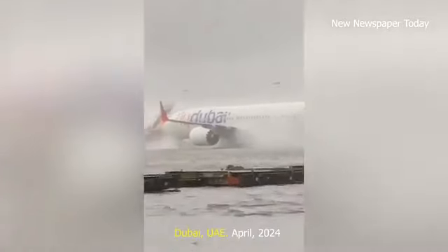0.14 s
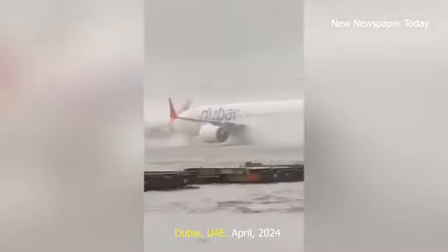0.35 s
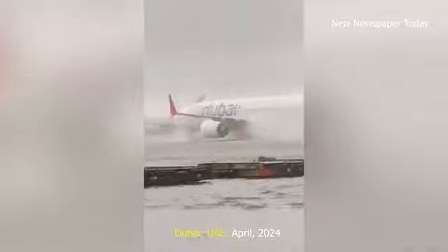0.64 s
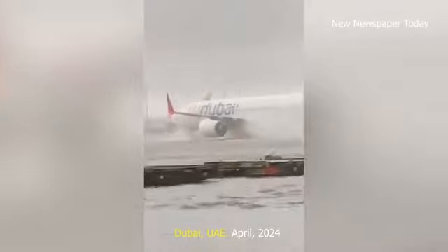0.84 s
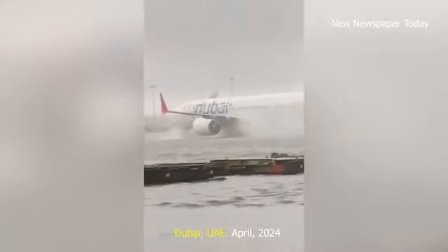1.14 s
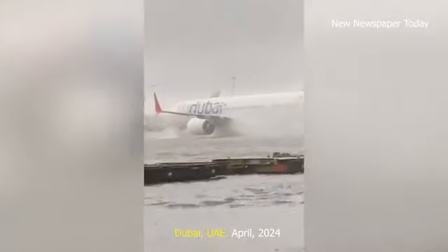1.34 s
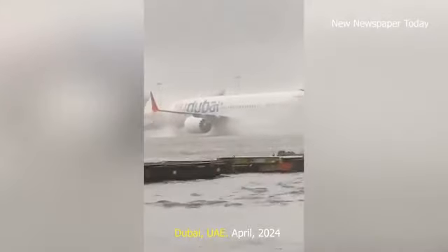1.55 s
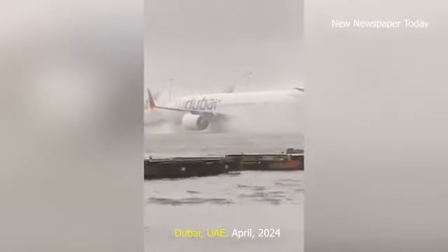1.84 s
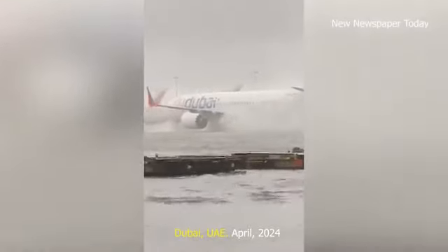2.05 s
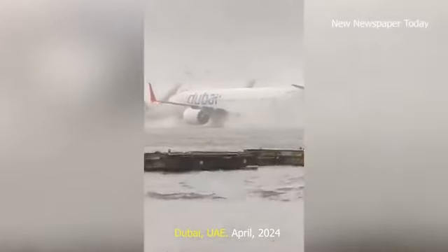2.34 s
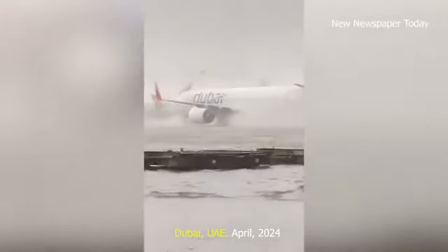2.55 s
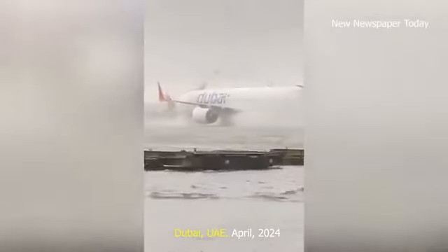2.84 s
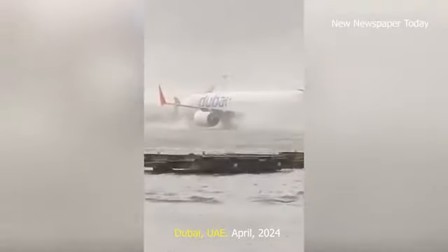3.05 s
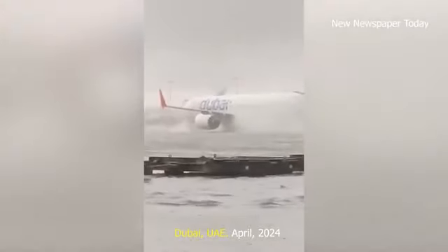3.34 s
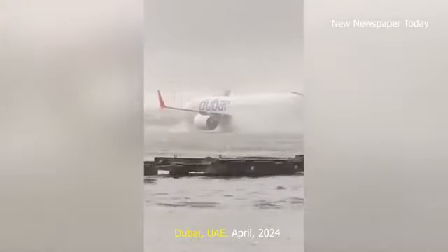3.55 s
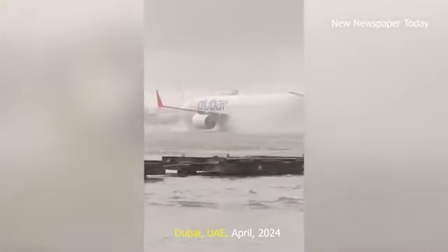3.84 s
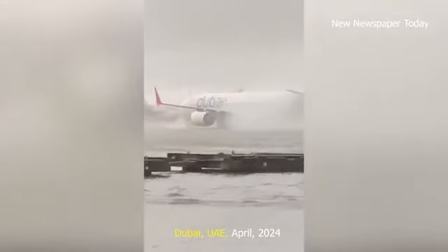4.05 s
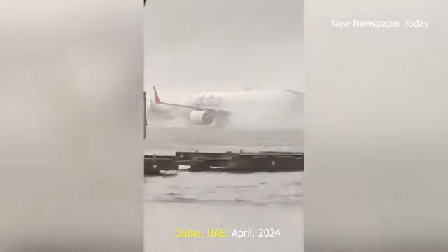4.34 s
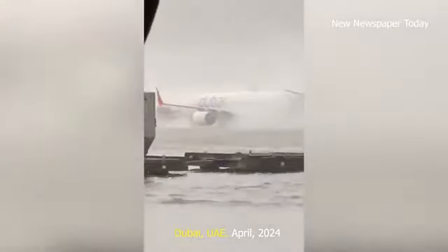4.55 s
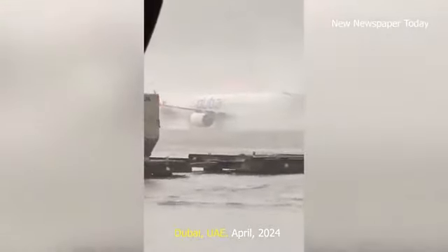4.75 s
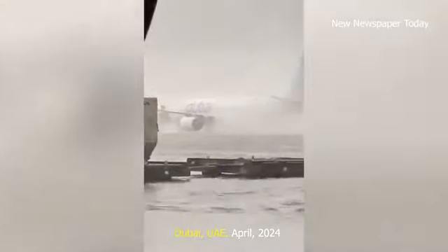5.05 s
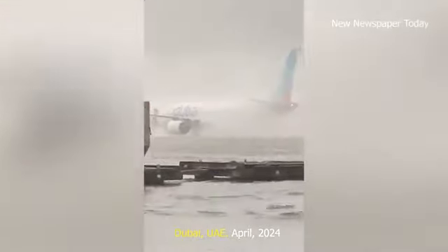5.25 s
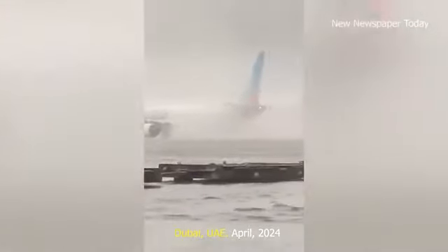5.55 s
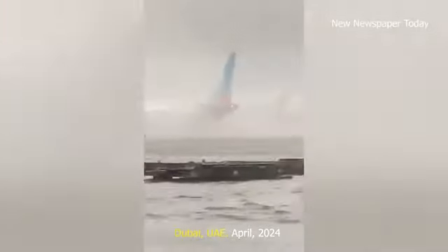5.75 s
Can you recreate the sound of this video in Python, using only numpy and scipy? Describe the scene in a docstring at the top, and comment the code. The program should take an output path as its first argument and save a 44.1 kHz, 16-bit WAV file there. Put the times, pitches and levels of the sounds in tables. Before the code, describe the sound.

Outdoor phone capture in stereo: continuous spattery water hiss and jet engine noise at a distance, with two slightly different whining tones fading in and out over a surging low roar. Close wind noise pops and rumbles on the microphone early, gets violent, drops away mid-way leaving engines and water clearer, then returns as heavy dull thuds, strongest shortly before the end.

```python
"""An airliner taxis through deep floodwater, heard across an apron in a storm.
From the start its fans whine in fading tones, its exhaust roars as coloured noise, and spray and rain hiss.
Wind on a phone's two ports slaps and thumps at once, worst from about 1.4 to 1.8 s, then eases.
A short knock near 2.7 s leads to a calmer stretch; gusts return after 4.5 s and peak near 5.4 s.
Buffets, flutter and thumps are shaped noise, eddies opposed noise, slaps single pressure pulses."""
import sys
import numpy as np
from scipy import signal
from scipy.fft import rfft, irfft, next_fast_len
from scipy.io import wavfile
from scipy.ndimage import uniform_filter1d, minimum_filter1d, map_coordinates

SR = 44100
rng = np.random.default_rng(int(sys.argv[2]) if len(sys.argv) > 2 else 0)


def wrap_up_sound(samples):
    """Save the sound to the file named by the first command line argument, as 16-bit audio."""
    columns = np.atleast_2d(samples).T
    # keep every value between -1 and 1, then stretch to whole-number steps
    tamed = np.clip(columns, -1, 1)
    steps = np.round(tamed * 32767).astype(np.int16)
    wavfile.write(sys.argv[1], SR, steps)


N = 260190

# Spray and rain colour. Each row: frequency in Hz, density in dB per Hz (relative).
SPRAY_SPECTRUM = [(400, -25), (1200, .3), (1800, .7), (2100, 2.5), (2700, 1.7), (3500, .3), (4300, .3),
                  (4650, 1.2), (4900, 2), (5300, .8), (5900, -1), (6700, .8), (7900, -5), (8800, -2.5),
                  (9200, -8), (9600, -8), (10000, -13), (10900, -16), (11400, -28)]
# Left-right likeness of the spray. Each row: frequency in Hz, correlation from -1 to 1.
SPRAY_ALIKE = [(1200, .1), (1800, .97), (2100, .85), (2500, .4), (3300, .98), (4000, .97), (4600, .3),
               (4790, -.88), (4970, -.9), (5130, .4), (5300, .97), (6200, .97), (6600, .65), (7200, .55),
               (8500, .1), (9800, -.94), (11000, -.98)]

# Low wind buffeting. Each row: time in seconds, level in dB before BUFFET_TRIM_DB.
BUFFET_LEVEL = [(0.0, -36), (0.75, -29), (1.13, -35.5), (1.22, -22), (1.28, -26.5), (1.40, -12),
                (1.47, -23.5), (1.68, -20.5), (1.79, -16), (1.9, -29), (2.05, -31.5), (2.56, -41),
                (2.66, -28), (2.8, -24.5), (2.93, -34.5), (3.45, -37), (3.54, -28), (3.95, -31),
                (4.03, -20), (4.28, -30), (4.42, -22.5), (4.65, -19.5), (4.8, -31), (4.98, -22.5),
                (5.3, -20.5), (5.5, -14.5), (5.56, -19), (5.9, -25)]
# Brighter wind flutter. Each row: time in seconds, level in dB before the trim and the tearing threshold.
FLUTTER_LEVEL = [(0.0, -24.5), (0.56, -27.5), (0.67, -22), (0.77, -29.5), (1.08, -27.5), (1.74, -27),
                 (1.94, -29.5), (2.25, -29), (2.5, -28.5), (4.08, -30), (4.55, -27), (4.76, -33.5),
                 (5.41, -25.5), (5.52, -29.5), (5.9, -26)]
# Colours of buffeting and flutter. Each row: frequency in Hz, density in dB per Hz (relative).
BUFFET_SPECTRUM = [(15, -24), (35, -6), (60, 9), (90, 6.5), (130, 1.5), (220, -10.5), (500, -11),
                   (1200, -92)]
FLUTTER_SPECTRUM = [(60, -39), (140, -15), (200, 6.5), (300, 2.5), (450, -5.5), (700, -13.5), (1100, -28.5),
                    (2500, -16.5), (6000, -100)]
BUFFET_TRIM_DB, FLUTTER_TRIM_DB = -.5, .5
TEAR_DB = -30.5  # flutter dies away below this level

# Puffs that strike the ports differently. Each row: time in seconds, level in dB, half-length in seconds.
EDDIES = [(0.2, -33, .15), (0.51, -29.5, .025), (0.774, -29, .035), (1.08, -29, .09), (1.49, -21, 0.07),
          (1.605, -27, .04), (1.888, -21.5, 0.035), (2.52, -27, .05), (3.248, -35.5, .03),
          (3.748, -29, .035), (4.612, -27, 0.17), (4.882, -31.5, 0.027), (5.328, -31.5, .06),
          (5.57, -26.5, 0.049), (5.78, -33.5, .08)]
# Eddy colour. Each row: frequency in Hz, density in dB per Hz (relative).
EDDY_SPECTRUM = [(20, -4), (60, 2), (120, 7), (280, 12.5), (500, 7), (900, 0), (2000, -38)]

# Gusts that hit the ports head-on. Each row: time in seconds, level in dB, half-length in seconds,
# brightness in dB per octave about THUMP_PIVOT_HZ.
THUMPS = [(0.303, -15.5, 0.022, -1), (0.694, -22.5, .03, 1.5), (1.026, -21.5, 0.018, 2.5),
          (1.392, -11.5, 0.02, -3), (1.649, -9.5, 0.015, 0.5), (1.77, -13.5, 0.024, -0.5),
          (2.706, -20, 0.024, 4.5), (2.763, -23.5, .04, 5), (4.54, -12, 0.013, -5),
          (4.975, -14.5, 0.018, -7), (5.361, -13.5, 0.019, -8), (5.433, -11, 0.019, 0.5),
          (5.494, -12.5, 0.03, -9)]
# Thump colour before brightness. Each row: frequency in Hz, density in dB per Hz (relative).
THUMP_SPECTRUM = [(30, -9), (70, 4.5), (160, 4), (310, 0.5), (560, -4.5), (850, -16.5), (1200, -25),
                  (2500, -43), (6000, -100)]
THUMP_PIVOT_HZ = 250

# Single vortices that slap the ports. Each row: time in seconds, level of the main push in dB, pitch in Hz.
SLAPS = [(0.077, -12, 230), (0.109, -12, 150), (0.188, -11, 220), (0.214, -6, 340), (0.308, -13, 260),
         (0.381, -13, 150), (0.646, -13, 260), (1.012, -10.5, 474), (1.063, -10, 290), (1.195, -7, 200),
         (1.217, -7.5, 140), (1.372, -8, 150), (1.394, -6.5, 190), (1.64, -7, 300), (1.658, -5, 420),
         (1.686, -5.5, 140), (1.772, -10, 280), (1.807, -11, 100), (1.915, -10, 141), (2.704, -9, 430),
         (3.255, -12, 190), (3.324, -11, 240), (3.536, -13, 170), (4.55, -9, 80), (4.885, -12.5, 138),
         (4.961, -7.5, 170), (5.216, -10, 130), (5.245, -10.5, 230), (5.392, -5, 260), (5.444, -4, 260),
         (5.472, -6, 120), (5.496, -7.5, 75), (5.594, -9.5, 110)]
SNAP_DB, SNAP_RATIO = -13.5, 2.4  # sharp core: level re main push, times narrower

# Exhaust roar. Each row: time in seconds, level in dB.
ROAR_LEVEL = [(0.0, -26.5), (0.35, -25), (0.57, -29.5), (1.02, -26), (1.47, -34), (1.7, -26), (2.15, -31.5),
              (2.6, -27.5), (3.3, -27.5), (3.8, -27.5), (4.1, -26), (4.3, -29.5), (4.85, -28.5), (5.5, -27),
              (5.9, -27.5)]
# Exhaust colour. Each row: frequency in Hz, density in dB per Hz (relative).
ROAR_SPECTRUM = [(25, -42), (60, -22), (120, -16), (220, -4.5), (350, -1.5), (480, 4), (620, -3), (800, -2),
                 (950, -10), (1300, -15), (2500, -78)]
# Left-right likeness of the exhaust. Each row: frequency in Hz, correlation from -1 to 1.
ROAR_ALIKE = [(60, 0.99), (150, 1), (300, 0.84), (500, 0.34), (750, 0), (1200, 0)]
ROAR_PATCHY_DB = 2.8
# Deep engine drone, rising and fading on a curve of its own.
# Each row: time in seconds, level in dB before a 2 dB cut.
DRONE_LEVEL = [(0.0, -24.5), (0.33, -21.5), (0.55, -27), (0.68, -25.5), (0.77, -34), (1.03, -21.5),
               (1.2, -17.5), (1.5, -23.5), (1.88, -21.5), (2.05, -38.5), (2.27, -33.5), (2.49, -20),
               (2.85, -33.5), (3.07, -33.5), (3.15, -18.5), (3.21, -25), (3.53, -18.5), (3.64, -24),
               (3.76, -19), (3.92, -23), (4.2, -20.5), (4.48, -23.5), (4.86, -20.5), (5.3, -23),
               (5.45, -16), (5.62, -25), (5.9, -17.5)]
# Deep drone colour. Each row: frequency in Hz, density in dB per Hz (relative).
DEEP_SPECTRUM = [(70, -45), (100, -7), (120, -1), (152, -5.5), (180, 2.5), (205, -8), (260, -6), (400, -89),
                 (1200, -100)]
# Droning resonances of the engines. Each row: frequency in Hz, width in Hz, mean level in dB.
DRONE_BANDS = [(179, 20, -31.5), (266, 16, -38.5), (307, 20, -32), (517, 22, -39), (585, 20, -46),
               (640, 24, -46)]

# Fan tones, each rising and fading on a curve of its own: near fan, its octave, far fan.
# Each row: time in seconds, level in dB before the trim.
NEAR_LEVEL = [(0.0, -34), (0.2, -37.5), (0.33, -35.5), (0.38, -53.5), (0.46, -41), (0.73, -53),
              (0.82, -37.5), (0.9, -39.5), (0.98, -46), (1.2, -45.5), (1.36, -47.5), (1.46, -40.5),
              (1.6, -39.5), (1.8, -57), (1.92, -38.5), (2.03, -51.5), (2.2, -38), (2.4, -41), (2.53, -33.5),
              (2.66, -36.5), (2.84, -46), (2.96, -38.5), (3.15, -33), (3.36, -43.5), (3.58, -35),
              (3.65, -54), (3.79, -40.5), (3.88, -47), (4.05, -38), (4.2, -34), (4.28, -37), (4.35, -43),
              (4.5, -37), (4.6, -43.5), (4.73, -39), (4.92, -44.5), (5.04, -36.5), (5.18, -38), (5.22, -51),
              (5.36, -48.5), (5.8, -39), (5.9, -42)]
OCTAVE_LEVEL = [(0.0, -27), (0.05, -37), (0.13, -47), (0.33, -49), (0.44, -41), (0.5, -45), (0.62, -45),
                (0.88, -45), (0.97, -58), (1.06, -42), (1.16, -40), (1.28, -50), (1.72, -45), (1.79, -48),
                (2.25, -46), (2.48, -56), (2.65, -40), (2.94, -48), (3.03, -40), (3.14, -47), (3.4, -48),
                (3.56, -39.5), (3.64, -42.5), (3.7, -52.5), (3.84, -38), (3.93, -44.5), (4.05, -44),
                (4.2, -35.5), (4.33, -54.5), (4.46, -41.5), (4.6, -48.5), (4.93, -52), (5.05, -44),
                (5.18, -52.5), (5.32, -44.5), (5.9, -46.5)]
FAR_LEVEL = [(0.0, -40.5), (0.21, -50), (0.4, -45), (0.69, -43), (0.84, -60), (0.98, -43), (1.1, -55),
             (1.24, -45.5), (1.43, -39), (1.49, -56), (1.59, -47), (1.74, -53), (1.95, -37), (2.05, -59),
             (2.3, -49), (2.5, -43), (2.7, -53), (3.12, -47), (3.19, -57), (3.47, -43), (3.58, -47),
             (3.73, -40.5), (3.98, -62.5), (4.12, -41.5), (4.28, -43.5), (4.36, -54), (4.67, -59),
             (4.75, -41), (4.8, -56.5), (4.86, -37.5), (4.92, -58), (5.37, -62), (5.43, -42.5), (5.54, -39),
             (5.6, -49), (5.77, -41), (5.9, -46)]
NEAR_HZ, FAR_HZ = 2181, 2412
NEAR_TRIM_DB, OCTAVE_TRIM_DB, FAR_TRIM_DB = 4.5, 3.5, 3
NEAR_WAVER_RAD, OCTAVE_WAVER_RAD, FAR_WAVER_RAD = .95, 1.6, 1.0  # phase bending by gusty air
SKIRT_FOLLOWS = 0.2  # share of a fan tone's fading, in dB, that its hissy skirt takes
# Thin whistles. Each row: frequency in Hz, width in Hz, level in dB, phase between ports in radians.
WHISTLES = [(4824, 24, -49, 2.9), (6544, 24, -57, .7), (7416, 16, -52.5, 1.4), (8190, 28, -59, 1.5),
            (8722, 50, -59, 1.6)]

TOP_HZ = 11600  # band limit of the phone


def amp(db):
    """Decibels to gain."""
    return 10 ** (np.asarray(db) / 20)


def unit(x):
    """Scale to rms 1."""
    return x / np.sqrt(np.mean(x ** 2) + 1e-20)


def along(points, hz):
    """Interpolate (Hz, value) points on a log axis."""
    f, v = np.transpose(points)
    return np.interp(np.log(hz + 1), np.log(f + 1), v)


def curve(rows):
    """Interpolate (seconds, value) rows to one value per sample."""
    s, v = np.transpose(rows)
    return np.interp(np.arange(N) / SR, s, v)


def wobble(rate_hz):
    """A smooth random curve with rate_hz knots a second."""
    knots = rng.standard_normal(int(N * rate_hz / SR) + 4)
    return map_coordinates(knots, [np.arange(N) * rate_hz / SR])


def filtered(x, response):
    """Multiply the spectrum of x by a response of frequency."""
    size = next_fast_len(N + SR // 4)
    spectrum = rfft(x, size) * response(np.fft.rfftfreq(size, 1 / SR))
    return irfft(spectrum, size)[..., :N]


def noise(spectrum):
    """Mono noise of rms 1 with the given colour."""
    return unit(filtered(rng.standard_normal(N), lambda hz: amp(along(spectrum, hz))))


def steadied(x, span_s):
    """Hold the rms near 1 over span_s, keeping the finer grain."""
    size = int(span_s * SR) + 1
    power = uniform_filter1d(uniform_filter1d(x ** 2, size=size), size=size)
    return x / np.sqrt(np.abs(power) + 1e-9)


def rush(spectrum, alike, patchy_db):
    """Stereo noise of rms 1 with time-frequency patches of random gain; mid and side set the likeness."""
    z = signal.stft(rng.standard_normal((2, N)), nperseg=512)[2]
    field = uniform_filter1d(rng.standard_normal(z.shape[1:]), size=5, axis=0)
    field = uniform_filter1d(field, size=11, axis=1)
    pair = signal.istft(z * amp(patchy_db * unit(field)), nperseg=512)[1][:, :N]

    def mid_side_response(hz):
        """Weight mid and side by half the angle whose cosine is the correlation."""
        angle = np.arccos(np.clip(along(alike, hz), -1, 1)) / 2
        return amp(along(spectrum, hz)) * np.array([np.cos(angle), np.sin(angle)])

    mid, side = filtered(pair, mid_side_response)
    return unit(np.array([mid + side, mid - side]))


def scatter(width_hz):
    """Complex amplitude of a tone scattered by turbulence, rms 1."""
    return unit(wobble(width_hz)) / np.sqrt(2) + 1j * unit(wobble(width_hz)) / np.sqrt(2)


def tone(hz, swing, lead_rad):
    """A tone with complex amplitude swing, rms 1, reaching the left port lead_rad earlier."""
    wave = swing * np.exp(2j * np.pi * hz * np.arange(N) / SR)
    return unit(np.real(wave * np.exp(.5j * lead_rad * np.array([[1], [-1]]))))


def spray():
    """Sheets of thrown water and rain merge into one restless, spattering hiss."""
    swell_db = .25 * wobble(5) + .45 * wobble(18) + .7 * wobble(900)
    return amp(swell_db - 31.0) * rush(SPRAY_SPECTRUM, SPRAY_ALIKE, patchy_db=2.2)


def wind():
    """Gusts buffet the phone in low noise; the brighter flutter passes only where its level is high."""
    lumps = wobble(45)
    buffet_air = steadied(amp(2 * lumps) * noise(BUFFET_SPECTRUM), span_s=0.19)
    buffet = amp(curve(BUFFET_LEVEL) + BUFFET_TRIM_DB) * buffet_air
    flutter_db = curve(FLUTTER_LEVEL)
    excess = amp(flutter_db + FLUTTER_TRIM_DB) / (1 + amp(2 * (TEAR_DB - flutter_db)))
    grain_db = 2.6 * lumps + 2.6 * wobble(170)
    flutter = excess * steadied(amp(grain_db) * noise(FLUTTER_SPECTRUM), span_s=0.13)
    return buffet + flutter


def eddies():
    """Small eddies push one port while they pull the other; each puff swells and fades smoothly."""
    t = np.arange(N) / SR
    force = sum(amp(db) * np.exp(-((t - s) / half_s) ** 2) for s, db, half_s in EDDIES)
    swirl = unit(amp(4.0 * wobble(35)) * noise(EDDY_SPECTRUM))
    return force * swirl * np.array([[1], [-1]])


def thumps():
    """Each sharp gust is a burst of turbulence that swells and collapses; bright ones rip, dull ones thud."""
    t, out = np.arange(N) / SR, np.zeros(N)
    air = amp(2 * wobble(300)) * noise(THUMP_SPECTRUM)
    for s, db, half_s, tilt_db in THUMPS:
        burst = filtered(air, lambda hz: amp(tilt_db * np.log2(np.clip(hz, 60, 1200) / THUMP_PIVOT_HZ)))
        envelope = np.exp(-np.abs(t - s) / half_s)
        out += amp(db) * envelope * steadied(burst, span_s=.012)
    return out


def push(t, hz):
    """One push of pressure between two pulls, centred on t = 0."""
    u = np.minimum((np.pi * hz * t) ** 2, 40)
    return (1 - 2 * u) * np.exp(-u)


def slaps():
    """A passing vortex is one ragged push with a sharp core; the narrower it is, the higher it sounds."""
    t, out = np.arange(N) / SR, np.zeros(N)
    for s, db, hz in SLAPS:
        near = slice(max(int((s - .03) * SR), 0), int((s + .03) * SR))
        core = amp(SNAP_DB) * push(t[near] - s, SNAP_RATIO * hz)
        out[near] += amp(db) * (push(t[near] - s, hz) + core)
    return out * (1 + 0.13 * wobble(1400))


def roar():
    """The exhaust surges in lumps over a deep drone, whose narrow bands fade partly along with it."""
    exhaust_db = curve(ROAR_LEVEL) + 1.65 * wobble(18)
    exhaust = amp(exhaust_db) * rush(ROAR_SPECTRUM, ROAR_ALIKE, ROAR_PATCHY_DB)
    deep_db = curve(DRONE_LEVEL)
    deep = amp(deep_db - 2) * steadied(noise(DEEP_SPECTRUM), span_s=0.04)
    bands = sum(amp(db) * tone(hz, scatter(width_hz), lead_rad=0.057) for hz, width_hz, db in DRONE_BANDS)
    drone = unit(amp(0.57 * deep_db)) * bands
    balance = amp(0.53 * np.array([[1], [-1]]))  # left port slightly louder
    return (exhaust + drone) * balance + deep


def fan(hz, level_db, lead_rad, rough, waver_rad, skirt_db, skirt_hz, skirt_width_hz):
    """A wavering blade tone with a hissy skirt just above it, which shares a little of its fading."""
    swing = np.exp(1j * waver_rad * wobble(10)) * (1 + rough * scatter(30))
    core = tone(hz, swing, lead_rad + .25 * wobble(7))
    skirt = tone(skirt_hz, scatter(skirt_width_hz), lead_rad)
    skirt_level_db = skirt_db + SKIRT_FOLLOWS * (level_db - level_db.mean())
    return amp(level_db) * core + amp(skirt_level_db) * skirt


def whine():
    """Two fans at slightly different speeds, with an octave of the near one and thin whistles above."""
    near = fan(NEAR_HZ, curve(NEAR_LEVEL) + NEAR_TRIM_DB, lead_rad=0.57, rough=0.35,
               waver_rad=NEAR_WAVER_RAD, skirt_db=-42.5, skirt_hz=2208, skirt_width_hz=140)
    octave = fan(2 * NEAR_HZ, curve(OCTAVE_LEVEL) + OCTAVE_TRIM_DB, lead_rad=1.2, rough=.5,
                 waver_rad=OCTAVE_WAVER_RAD, skirt_db=-39.0, skirt_hz=4430, skirt_width_hz=300)
    far = fan(FAR_HZ, curve(FAR_LEVEL) + FAR_TRIM_DB, lead_rad=0.98, rough=0.5,
              waver_rad=FAR_WAVER_RAD, skirt_db=-50, skirt_hz=2415, skirt_width_hz=130)
    whistles = sum(amp(db) * tone(hz, scatter(width_hz), lead_rad)
                   for hz, width_hz, db, lead_rad in WHISTLES)
    return near + octave + far + whistles


def scene():
    """Water, wind and aircraft together."""
    return spray() + wind() + eddies() + thumps() + slaps() + roar() + whine()


def record(dry):
    """The phone's limiter holds down the hardest gusts; nothing is kept above its band limit."""
    needed = np.minimum(1, .8 / (np.abs(dry).max(axis=0) + 1e-9))
    gain = uniform_filter1d(minimum_filter1d(needed, size=300), size=300)
    return filtered(dry * gain, lambda hz: hz < TOP_HZ)


dry = scene()
out = record(dry)
wrap_up_sound(out)
```